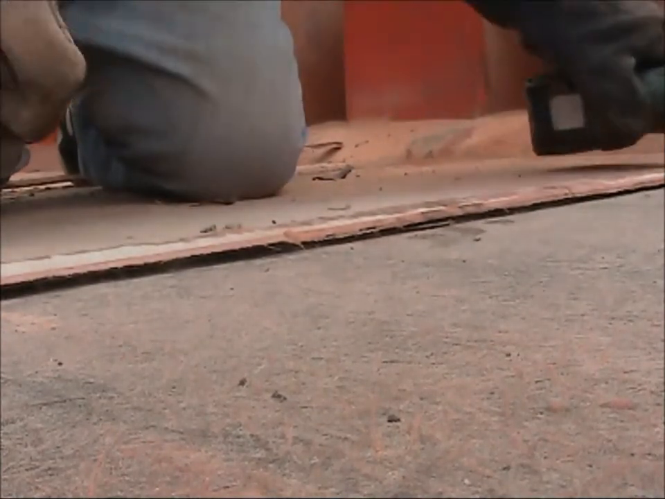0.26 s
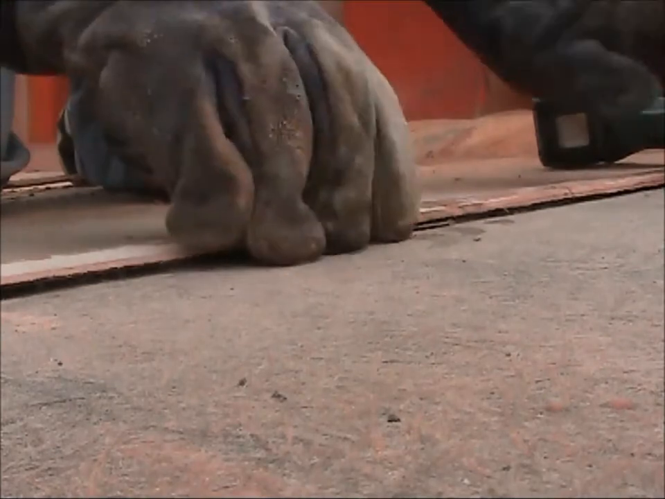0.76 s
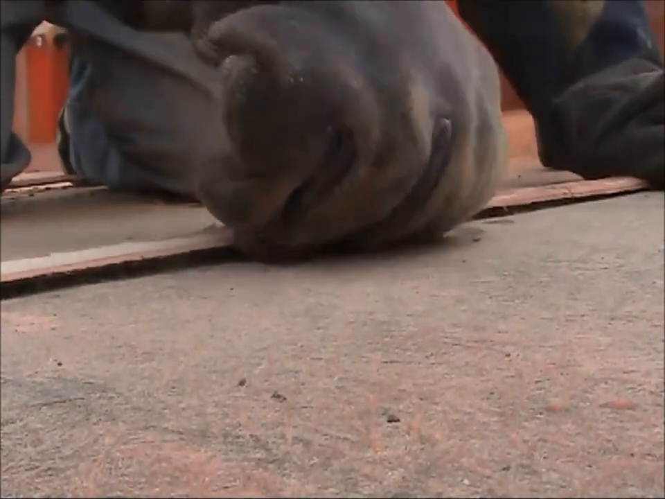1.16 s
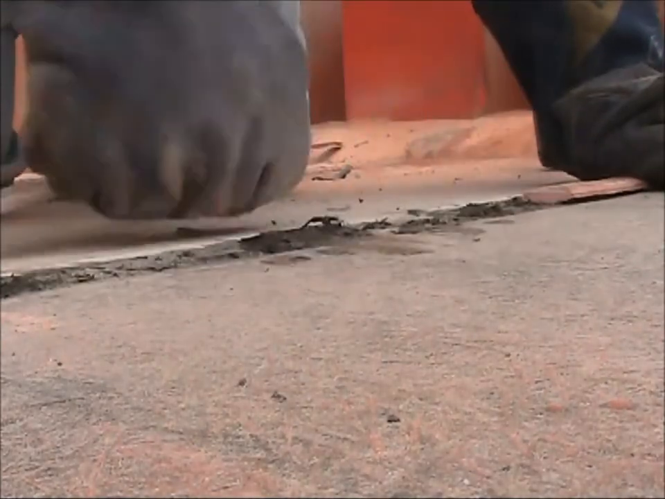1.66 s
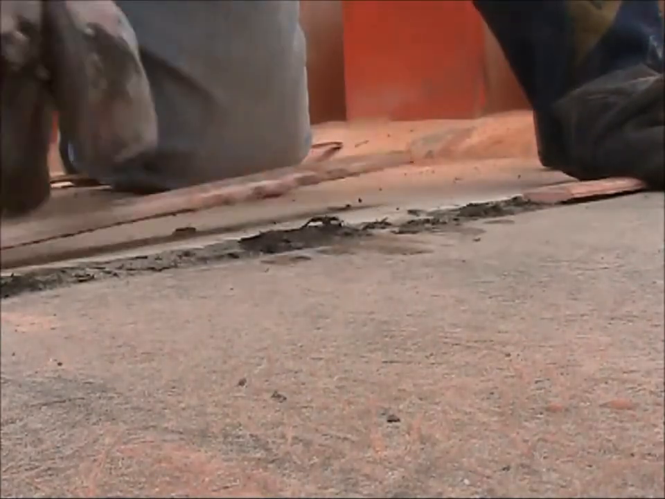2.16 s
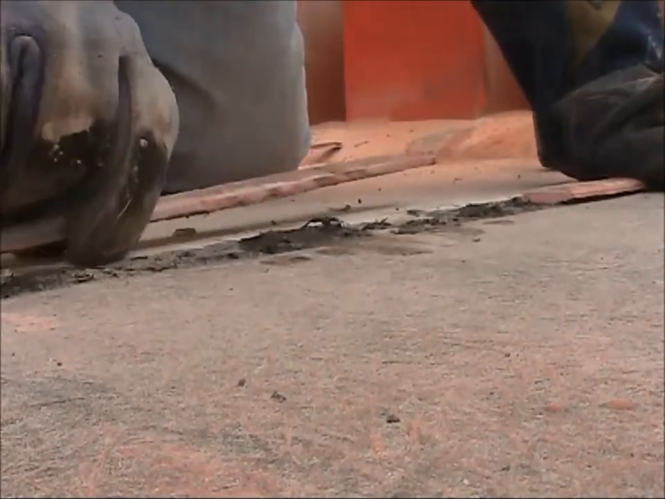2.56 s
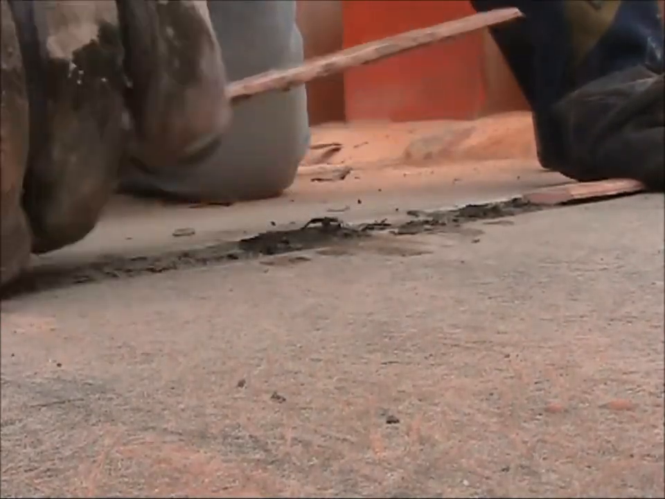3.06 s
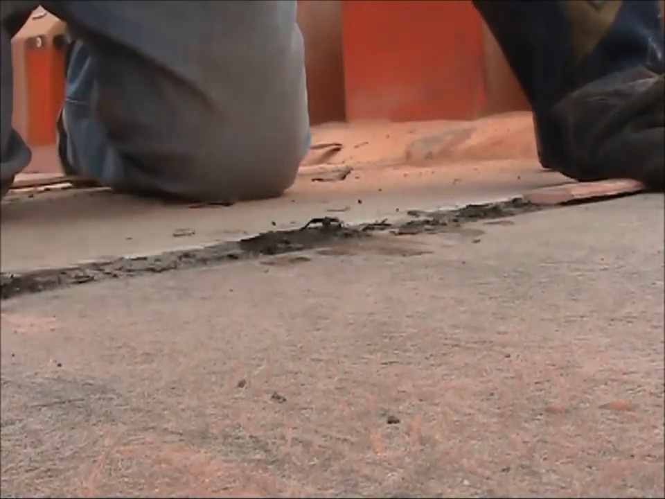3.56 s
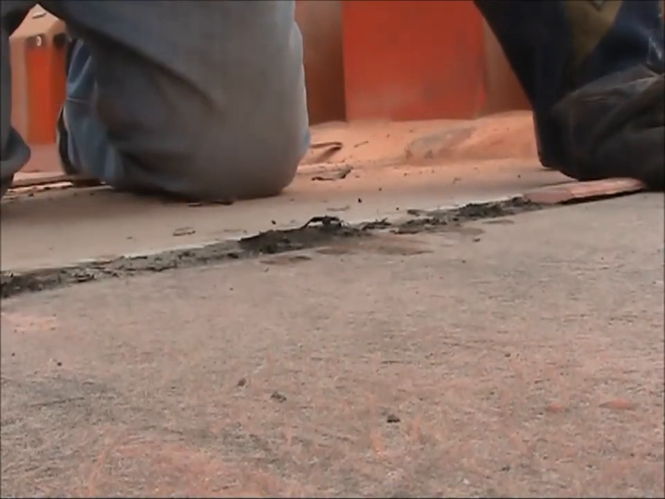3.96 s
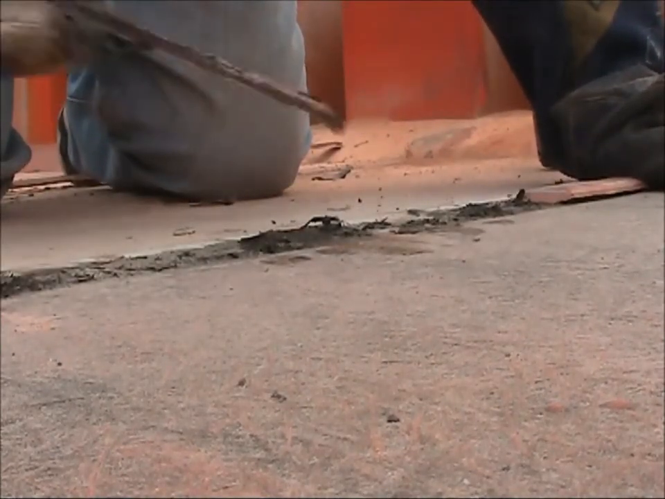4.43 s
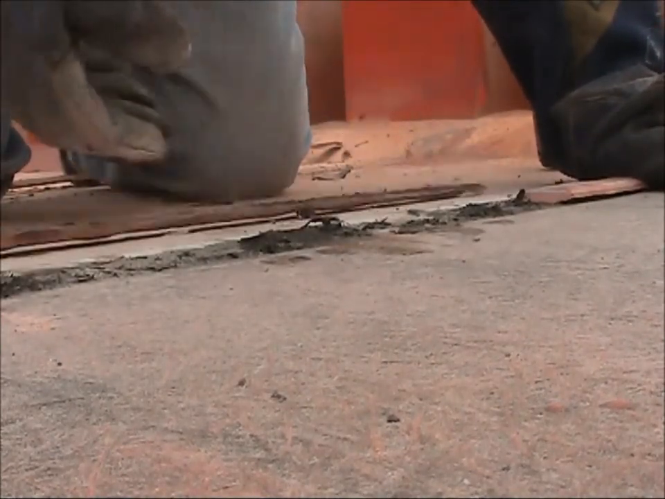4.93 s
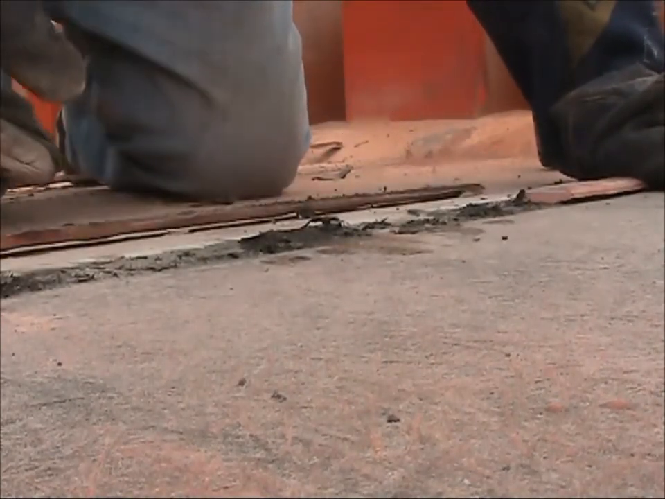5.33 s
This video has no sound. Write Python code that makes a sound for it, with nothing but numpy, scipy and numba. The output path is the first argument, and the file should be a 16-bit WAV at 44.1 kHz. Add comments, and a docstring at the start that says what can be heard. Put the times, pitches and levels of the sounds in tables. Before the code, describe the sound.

A steady, low, distant outdoor wash runs throughout, heard by a close stereo microphone near a hollow fibreglass deck. At 0.36 s a heavy stopped tool is set down: a booming double thump with casing rattle, settling by 0.6 s. Padded glove knocks and gritty scuffs follow from 0.7 to 1.3 s, with small cracks near 1.25 s. At 1.46 s a stiff strip snaps loudly, then unzips in rasping, groaning jerks until 1.7 s. Soft knocks and rubs come around 1.9-2.5 s, then light ticks, faint rough squeaks near 2.8 s and short damped rings. From 3.2 to 3.8 s tearing builds: sharp bright cracks, hiss, crackle and a sinking groan, slightly left. A final snap at 3.98 s rings out. After a lull, tiny rising squeals at 4.7 s precede a hard slapping clatter at 4.8 s, with bounces until 5.02 s. Loud blows clip and duck the level; only the wash remains.

```python
"""A strip of cut fibreglass snaps off a hollow boat deck, is torn free by a gloved hand, drops and bounces.
Breaks are bursts of noise that set the strip ringing; peeling adds rasps, hisses, crackle, groans and squeals.
Before that, a stopped angle grinder is set down: it rings the deck and its casing rattles. Glove and knee
knock on the deck and scuffs rub it. Steady outdoor noise lies behind. Loud blows clip and duck the level."""
import sys
import numpy as np
from scipy import signal
from scipy.fft import rfft, irfft, next_fast_len
from scipy.io import wavfile
from scipy.ndimage import map_coordinates
from numba import njit

SR = 44100
rng = np.random.default_rng(int(sys.argv[2]) if len(sys.argv) > 2 else 0)


def transcribe(u):
    """Save the signal u as a 16-bit wav file named by the first command-line argument.

    u: samples, shape (n,) or (channels, n), limited to [-1, 1]; the rate is SR.
    q: integer samples, one column per channel.
    """
    v = np.clip(np.atleast_2d(u).T, -1, 1)
    q = np.round(v * 32767).astype(np.int16)
    wavfile.write(sys.argv[1], SR, q)


N = 246519
T = np.arange(SR // 4) / SR  # seconds within one short sound
CLOCK = np.arange(N) / SR  # seconds within the scene
PORTS = np.array([[1], [-1]])  # sign of the left and right microphone port

# Bundles of fibres that give way, and the sharp front of one knock. Each row: start in seconds,
# relative level in dB, centre of the crack in Hz, t60 (time to fade by 60 dB) of the crackle in seconds.
CRACK_EVENTS = [(1.221, -22.5, 5070, 0.005), (1.277, -16.5, 2300, 0.019), (2.311, -25.5, 4200, 0.004),
                (2.469, -19, 3470, 0.0038), (2.665, -24.5, 3950, 0.0045), (2.677, -23, 4900, 0.0047),
                (2.8194, -17, 8700, 0.0081), (3.139, -28.5, 7000, 0.0037), (3.193, -24.5, 4970, 0.0035),
                (3.2164, -21, 5840, 0.0077), (3.312, -13.5, 3040, 0.0068), (3.32, -14.5, 2500, .008),
                (3.352, -22, 3000, 0.0054), (3.3579, -5.5, 2230, 0.0035), (3.3972, -10.5, 2500, 0.0057),
                (3.417, -20, 6000, .005), (3.428, -15, 7000, .005), (3.4494, -9.5, 7100, 0.0093),
                (3.457, -4.5, 6860, 0.017), (3.519, -1, 5030, 0.018), (3.5313, -10.5, 4100, 0.008),
                (3.544, -12, 5040, 0.019), (3.618, -22, 6000, .003), (3.626, -14, 9000, 0.0046),
                (3.6427, -8.5, 6000, 0.0099), (3.65, -13, 6060, .004), (3.6554, -20, 7000, .012),
                (3.674, -17, 8000, .005), (3.7251, -15.5, 3000, .01), (3.77, -16, 4000, 0.009),
                (3.7775, -2.5, 5800, 0.011), (3.9352, -16.5, 6860, 0.0042), (3.956, -16.5, 6500, 0.018),
                (3.983, -3.5, 7960, 0.0044)]
# The far end of the strip breaks free. Each row: start in seconds, relative crack level in dB,
# relative ring level in dB, centre of the ring in Hz.
FAR_BREAK = [(3.9853, -8, -21, 1360), (3.9882, -9, -20, 676), (3.9911, -8.5, -12.5, 317)]
# Ways in which the strip and the deck can ring, before each blow varies them slightly.
# Each row: frequency in Hz, relative level in dB, t60 in seconds for a life of 1.
STRIP_MODES = [(198, -4.5, 0.083), (305, 1.5, 0.124), (383.4, -5.5, 0.14), (423.7, 1.5, 0.16),
               (510, -2.5, 0.02), (646, 5.5, 0.055), (970, 5, 0.051), (1170, -6, .04), (1248, -4, 0.038),
               (1297, 11, 0.04), (1597, -6, 0.066), (1970, 8, 0.016), (3050, 0, 0.059), (3280, 14, 0.054),
               (5250, -12, 0.024)]
DECK_MODES = [(121.7, 3, 0.4), (133, 2, 0.21), (171, -0.5, 0.17), (201, 0.5, 0.26), (237.2, -6, 0.43),
              (283, 7, 0.18), (382.5, 4.5, 0.13), (406, -2.5, 0.19), (498, 4, 0.2), (569, -17, 0.26),
              (646, 0, 0.22), (716, 1.5, 0.16), (804, 2.5, 0.054), (820, 3.5, 0.067), (1000, -4, 0.22),
              (1290, 2.5, 0.14), (1360, -14, 0.15), (1914, 15.5, 0.07)]
# Tone colours of parting fibres and of soft contacts. Each row: frequency in Hz, relative level in dB per Hz.
FIBRE_SPECTRUM = [(100, -46), (300, 16.5), (480, 6.5), (750, -2), (1300, 1), (2200, -2.5), (3800, 4.5),
                  (6000, 0.5), (7800, -1), (9500, 2), (12000, -17), (15500, -6.5)]
TAP_SPECTRUM = [(100, -4.5), (500, 4), (1800, 0), (3500, -23), (8000, -29), (15500, -36)]


def breaking():
    """The strip snaps off nearby, unzips in scraping jerks and at last breaks free at its far end."""
    # A quick run of cracks. Each row: start in seconds, relative crack level in dB,
    # relative ring level in dB, centre of the ring in Hz.
    near_break = [(1.4615, -30, -21, 900), (1.4653, 1.5, 8, 1360), (1.469, -3, -2, 298),
                  (1.4728, -4, -9, 590), (1.4767, -1, -19, 330), (1.484, 2, -6, 547)]
    # The seam unzips. Each row: time in seconds, relative crack level in dB, relative scrape level in dB.
    jerk_rows = [(1.518, 0.5, -25), (1.568, -19.5, -21), (1.614, -18, -20.5), (1.664, -34, -34.5)]
    # Tone of the cracks. Each row: frequency in Hz, relative level in dB per Hz.
    crack_spectrum = [(100, -5), (400, 3.5), (1300, -6.5), (2300, -1), (4000, 2.5), (6500, 4), (9500, -4.5),
                      (12000, -11.5), (15500, -12)]
    # Tone of the scrape. Each row: frequency in Hz, relative level in dB per Hz.
    scrape_spectrum = [(300, -15), (1500, -9), (2600, 1), (3400, -3.5), (5000, 5), (6800, -5), (9000, -14),
                       (15500, -22)]
    rise_s, fall_s = 0.015, 0.013  # swell of the scrape around each jerk
    jerks = []
    slipping = np.zeros(N)
    for k, (s, crack_db, scrape_db) in enumerate(jerk_rows):
        ring_db = -9 - 11.5 * k  # each jerk rings less than the one before
        centre_hz = 780 * 0.71 ** k  # the ring drops as the freed length grows
        jerks.append((s, crack_db, ring_db, centre_hz))
        slipping += amp(scrape_db) * swell(s - rise_s, s, s + fall_s)
    near = strip_blows(near_break + jerks, crack_spectrum, octaves=0.72, life=0.57, puff_db=14.0,
                       edge_hz=23000, crack_t60=0.0089, tail_db=-23, tail_t60=0.044)
    near += rasp(slipping, scrape_spectrum, grain_db=0.5, clump_db=4.5)
    far = strip_blows(FAR_BREAK, FIBRE_SPECTRUM, octaves=0.61, life=1.0, puff_db=24,
                      edge_hz=18000, crack_t60=0.012, tail_db=-10.5, tail_t60=0.064)
    near_ports = placed(near, lead_us=29.0, pan_db=3.5, wet_db=-6.5, wet_t60=0.11)
    far_ports = placed(far, lead_us=36.0, pan_db=2.0, wet_db=-3.5, wet_t60=0.022)
    return near_ports + far_ports


def sharp_cracks():
    """Off to the left, fibre bundles snap and ring the hand-damped strip; one crack sharpens a knock."""
    # Tone of the snaps. Each row: frequency in Hz, relative level in dB per Hz.
    snap_spectrum = [(200, -1), (1500, 3), (9500, 1.5), (12000, -4.5), (15500, 3)]
    crack_offset_db, ring_offset_db = 9, -14.5
    ring_growth = 1.05  # big cracks ring the strip more
    usual_hz, scatter_octaves = 474, 0.11  # each crack rings at its own place
    body, cracks = np.zeros((2, N))
    for s, db, crack_hz, t60 in CRACK_EVENTS:
        add(cracks, s, amp(db + crack_offset_db) * snap(crack_hz, t60, octaves=0.62))
        centre_hz = usual_hz * 2 ** (scatter_octaves * rng.normal())
        sound = ring(STRIP_MODES, centre_hz, octaves=0.69, life=0.7, puff_db=14.0, puff_t60=0.11)
        add(body, s, amp(ring_growth * db + ring_offset_db) * sound)
    dry_cracks = body + coloured(cracks, snap_spectrum)
    return placed(dry_cracks, lead_us=29.5, pan_db=4.5, wet_db=-3.5, wet_t60=0.02)


def dropped():
    """The loose strip lands along its length, then end by end; the first landing also pushes the deck."""
    # Landings. Each row: start in seconds, relative slap level in dB, relative ring level in dB,
    # centre of the ring in Hz.
    landings = [(4.799, 9, 6.5, 520), (4.8067, 14, 3, 900), (4.8135, 13, -2, 556), (4.822, -1, -6.5, 480),
                (4.879, -37, -13, 510), (4.92, 1, -15.5, 1190), (4.926, -10.5, -12, 620),
                (4.93, -2.5, -7, 590), (4.96, -42, -21, 700), (4.9682, -33, -23, 910),
                (4.98, -9.5, -13.5, 1290), (4.984, -36, -10.5, 424), (5.018, -18.5, -22, 1190)]
    # Tone of the slaps. Each row: frequency in Hz, relative level in dB per Hz.
    slap_spectrum = [(40, -32), (180, -1.5), (420, 8.5), (650, -1), (1300, 2), (2400, -0.5), (3600, 0.5),
                     (6000, -4.5), (8500, -11.5), (11500, -25.5), (15500, -16)]
    clatter = strip_blows(landings, slap_spectrum, octaves=0.85, life=0.75, puff_db=12,
                          edge_hz=6500, crack_t60=0.006, tail_db=-21, tail_t60=0.06)
    thud_db, thud_hz = -6.5, 44.3
    thud = ring(DECK_MODES, thud_hz, octaves=0.94, life=1.0, puff_db=13.0, puff_t60=.047)
    add(clatter, landings[0][0], amp(thud_db) * thud)
    return placed(clatter, lead_us=23, pan_db=2.0, wet_db=-5.5, wet_t60=0.03)


def short_rings():
    """The held strip rings briefly, from knocks on the deck or from tears, damped by the hand."""
    # Short rings. Each row: start in seconds, relative level in dB, centre of the ring in Hz.
    ring_rows = [(2.889, -24.5, 1150), (2.8953, -21, 1080), (2.897, -25.5, 436), (3.076, -22.5, 1130),
                 (3.206, -20, 463), (3.229, -16.5, 470), (3.429, -24, 420), (3.458, -16, 500),
                 (3.533, -19.5, 554), (3.744, -19.5, 880)]
    front_db = -9  # noise at the front against the ring
    body, fronts = np.zeros((2, N))
    for s, db, centre_hz in ring_rows:
        sound = ring(STRIP_MODES, centre_hz, octaves=0.36, life=0.35, puff_db=10.5, puff_t60=0.055)
        add(body, s, amp(db) * sound)
        add(fronts, s, amp(db + front_db) * burst(t60=0.017, tail_db=-11, tail_t60=0.043))
    return placed(body + coloured(fronts, TAP_SPECTRUM), lead_us=20, pan_db=1.5, wet_db=-5, wet_t60=0.049)


def groaning():
    """Parting fibres shake the strip's bending mode: a band of noise sinks in pitch, with uneven jolts."""
    # Groans while peeling. Each row: start in seconds, end in seconds, first pitch in Hz,
    # last pitch in Hz, starting level in dB, fade in dB.
    groan_rows = [(1.48, 1.687, 570, 300, -29, 11), (3.363, 3.737, 480, 290, -39, 4)]
    knots_per_s = 190  # faster wobbles make a wider band of noise
    groan = np.zeros(N)
    for start, end, first_hz, last_hz, db, fade_db in groan_rows:
        freed = np.clip((CLOCK - start) / (end - start), 0, 1)
        pitch = first_hz + (last_hz - first_hz) * freed
        phase = 2 * np.pi * np.cumsum(pitch) / SR
        shake = wobble(knots_per_s) * np.sin(phase) + wobble(knots_per_s) * np.cos(phase)
        jolts = unit(amp(3 * wobble(70)))
        soft_ends = np.minimum(10 * np.minimum(freed, 1 - freed), 1)
        groan += shake * jolts * amp(db - fade_db * freed) * soft_ends
    return placed(groan, lead_us=31, pan_db=2.0, wet_db=-3.5, wet_t60=0.086)


def squeals():
    """Stick and slip as the strip is drawn along and swung down: rough whistles glide, swell and fade."""
    # Squeals. Each row: start in seconds, end in seconds, first pitch in Hz, last pitch in Hz,
    # relative level in dB, pitch roughness as a share of the pitch.
    squeal_rows = [(2.735, 2.805, 2850, 2600, -44, .11), (2.78, 2.822, 2620, 2230, -45, .03),
                   (2.765, 2.825, 3900, 3300, -48, .11), (4.685, 4.722, 4130, 4560, -48, .025),
                   (4.712, 4.75, 4480, 4700, -42, .035), (4.768, 4.8, 4230, 4500, -43, .045)]
    sound = np.zeros(N)
    for start, end, first_hz, last_hz, db, rough in squeal_rows:
        glide = np.interp(CLOCK, [start, end], [first_hz, last_hz])
        pitch = glide * (1 + rough * wobble(900))
        level = amp(db + 3 * wobble(250)) * np.sqrt(swell(start, (start + end) / 2, end))
        sound += level * np.sin(2 * np.pi * np.cumsum(pitch) / SR)
    return sound


def scuffs_and_rips():
    """Scuffs on the gritty deck, bright hissing rips of fibres, and a peeling rasp that swells at cracks."""
    # Scuffs on the deck and bright hissing rips of fibres. Each row: start in seconds, length in seconds,
    # relative level of the coarse noise in dB, relative level of the fine hiss in dB.
    noise_rows = [(0.489, 0.14, -37, -46.5), (0.784, 0.049, -32, -40), (0.95, 0.081, -35, -46),
                  (0.977, 0.21, -42.5, -54), (1.023, 0.073, -39, -50), (1.127, 0.019, -36, -52),
                  (1.266, 0.048, -32, -58), (1.479, 0.18, -31, -37), (1.885, 0.092, -44, -50),
                  (2.127, 0.054, -41.5, -51), (2.437, 0.044, -32, -44), (2.651, 0.22, -38.5, -43),
                  (2.88, 0.02, -35, -45), (2.93, 0.17, -43, -48.5), (3.067, 0.031, -42, -42),
                  (3.109, 0.18, -43.5, -55), (3.362, 0.028, -28.5, -54), (3.409, 0.024, -34, -34),
                  (3.505, 0.024, -31, -19), (3.616, 0.078, -36, -28.5), (3.711, 0.054, -30.5, -35)]
    # The long pull. Each row: time in seconds, relative level of the rasp in dB.
    pull_curve = [(3.3, -48), (3.522, -36.5), (3.582, -39), (3.736, -36.5), (3.82, -79)]
    # Tone of the coarse noise. Each row: frequency in Hz, relative level in dB per Hz.
    coarse_spectrum = [(100, -2), (400, 3), (1200, 3.5), (1900, 2), (2600, 5), (3400, 4), (4800, 0.5),
                       (7000, -5), (9500, -13.5), (12000, -24), (15500, -12)]
    # Tone of the fine hiss. Each row: frequency in Hz, relative level in dB per Hz.
    hiss_spectrum = [(1000, -41), (4000, -20), (6500, 2.5), (9500, 7), (12000, -4.5), (15500, 2)]
    rise_share = 0.52  # share of each noise spent swelling
    coarse, fine = np.zeros((2, N))
    for s, length, coarse_db, hiss_db in noise_rows:
        pressure = swell(s, s + rise_share * length, s + length)
        coarse += amp(coarse_db) * pressure
        fine += amp(hiss_db) * pressure
    noises = rasp(coarse, coarse_spectrum, grain_db=6.0, clump_db=3.0)
    noises += rasp(fine, hiss_spectrum, grain_db=6.0, clump_db=4.0)

    # a rasp swells just before and fades just after each crack
    before_s, after_s, strain_db = 0.016, 0.03, -28.5
    strain = np.zeros(N)
    for s, db, _, _ in CRACK_EVENTS:
        strain += amp(db + strain_db) * swell(s - before_s, s, s + after_s)
    s, db = np.transpose(pull_curve)
    pull_db, fade_s = -8, 0.086
    pulling = np.clip(np.minimum(CLOCK - s[0], s[-1] - CLOCK) / fade_s, 0, 1)
    pull = pulling * amp(np.interp(CLOCK, s, db) + pull_db)
    attached = CLOCK < FAR_BREAK[-1][0] + 0.021  # the last fibres part just after the final break
    peels = rasp((strain + pull) * attached, FIBRE_SPECTRUM, grain_db=3.5, clump_db=-3.5)
    peels += crackle(amp(3) * pull)  # single fibres, 3 dB above the pull
    return placed(noises + peels, lead_us=26.2, pan_db=1.0, wet_db=-5.0, wet_t60=0.048)


def grinder():
    """The heavy tool thumps the hollow deck edge first, rocks and settles; its casing rattles."""
    # Contacts. Each row: start in seconds, relative deck level in dB, centre of the ring in Hz,
    # relative level of the casing rattle in dB.
    contacts = [(.3635, 11, 760, -10), (0.3663, 18, 290, -2), (0.3718, 14, 397, -2.5),
                (.377, 15.5, 138, -9.5), (0.385, 5, 187, -7), (0.397, -4, 700, -24),
                (0.4227, -3, 785, -17.5), (.426, 11.5, 217, -11.5), (0.4314, -0.5, 626, -9.5),
                (0.437, 5, 266, -8), (0.4457, -26, 560, -25), (0.537, -10, 205, -41),
                (.549, -0.5, 157, -38), (.573, -7.5, 177, -48)]
    # Tone of the rattle. Each row: frequency in Hz, relative level in dB per Hz.
    casing_spectrum = [(200, 9), (900, -4.5), (2000, 2), (2800, -5.5), (4300, 6), (5400, -5), (6400, -12.5),
                       (8200, -6.5), (11000, -24.5), (15500, -21)]
    push_db, push_hz = -24, 38  # a low push under every contact
    deck, casing = np.zeros((2, N))
    for s, deck_db, centre_hz, rattle_db in contacts:
        push = ring(DECK_MODES, push_hz, octaves=1.0, life=0.5, puff_db=1.0, puff_t60=.035)
        thump = ring(DECK_MODES, centre_hz, octaves=0.74, life=0.55, puff_db=15.5, puff_t60=0.085)
        add(deck, s, amp(deck_db + push_db) * push)
        add(deck, s, amp(deck_db) * thump)
        add(casing, s, amp(rattle_db) * burst(t60=0.023, tail_db=-9.0, tail_t60=0.12))
    dry_grinder = deck + coloured(casing, casing_spectrum)
    return placed(dry_grinder, lead_us=-30, pan_db=2.5, wet_db=-3.0, wet_t60=0.023)


def knocks():
    """Padded touches of glove and knee, and a low deck thump as the strip breaks free; high ones die sooner."""
    # Knocks and the thump (last row). Each row: start in seconds, relative level in dB,
    # centre of the ring in Hz.
    deck_blows = [(0.726, -12.5, 448), (.742, -13.5, 242), (1.038, -16, 507), (1.044, -15, 277),
                  (1.054, -19, 290), (1.086, -25, 294), (1.136, -26.5, 305), (1.278, -17, 383),
                  (1.938, -22, 393), (2.083, -26.5, 368), (2.322, -29, 330), (2.469, -30, 332),
                  (3.75, -21, 216), (3.994, -26.5, 120)]
    life_at_400_hz, damping = 0.46, 0.59  # share of the free deck's ring time; how fast it falls with pitch
    tap_db, tap_db_per_octave = -13, 3.5  # contact noise at 600 Hz; harder, higher knocks have more
    deck, taps = np.zeros((2, N))
    for s, db, centre_hz in deck_blows:
        life = life_at_400_hz * (400 / centre_hz) ** damping
        sound = ring(DECK_MODES, centre_hz, octaves=0.4, life=life, puff_db=19.5, puff_t60=0.24 * life)
        add(deck, s, amp(db) * sound)
        hardness = np.log2(centre_hz / 600)
        contact_db = db + tap_db + tap_db_per_octave * hardness
        add(taps, s, amp(contact_db) * burst(t60=0.023, tail_db=-4, tail_t60=0.041))
    return placed(deck + coloured(taps, TAP_SPECTRUM), lead_us=4.2, pan_db=2.5, wet_db=-17.5, wet_t60=0.049)


def outdoors():
    """A distant wash of noise reaches the right port first; a weaker one, opposite at the ports, widens it."""
    # Tone of the wash. Each row: frequency in Hz, relative level in dB per Hz.
    air_spectrum = [(25, -22), (60, -3), (120, 1.5), (185, 4.5), (260, -0.5), (430, 3.5), (600, -3.5),
                    (1200, -4), (2000, -8.5), (3300, -11), (5500, -13), (9000, -21), (12000, -30.5),
                    (15500, -27)]
    # Loudness over time. Each row: time in seconds, level in dB.
    level_curve = [(0, -41), (1, -38), (2, -41.5), (3, -42), (4.2, -42.5), (4.7, -41.5), (5.1, -42),
                   (5.59, -39.5)]
    wash = coloured(rng.standard_normal(N), air_spectrum)
    diffuse = coloured(rng.standard_normal(N), air_spectrum)
    lead_s = 30 / 10 ** 6
    pair = filtered(wash, lambda hz: np.exp(-1j * np.pi * hz * PORTS * lead_s))
    pair += PORTS * amp(-8.5) * diffuse
    level_db = np.interp(CLOCK, *np.transpose(level_curve)) + 0.043 * wobble(5.2)
    return pair * amp(level_db + PORTS * 0.12)


def strip_blows(blows, spectrum, octaves, life, puff_db, edge_hz, crack_t60, tail_db, tail_t60):
    """Each break or contact is a sharp crack, duller when weak, and the stiff strip rings after it."""
    dulling_db_per_octave = 22  # a blow this much weaker sounds an octave duller
    body, cracks = np.zeros((2, N))
    for s, crack_db, ring_db, centre_hz in blows:
        add(body, s, amp(ring_db) * ring(STRIP_MODES, centre_hz, octaves, life, puff_db, puff_t60=0.084))
        cutoff_hz = edge_hz * 2 ** (crack_db / dulling_db_per_octave)
        pole = np.exp(-2 * np.pi * cutoff_hz / SR)
        crack = signal.lfilter([1 - pole], [1, -pole], burst(crack_t60, tail_db, tail_t60))
        add(cracks, s, amp(crack_db) * crack)
    return body + coloured(cracks, spectrum)


def ring(modes, centre_hz, octaves, life, puff_db, puff_t60):
    """A struck panel: clear modes and a puff of crowded, damped ones; the blow favours a band of pitches."""
    hz, db, t60 = np.transpose(modes)
    size = amp(db + rng.standard_normal(len(hz)))
    hz = hz * (1 + 0.012 * rng.standard_normal(len(hz)))  # slight detuning
    waves = np.sin(2 * np.pi * hz[:, None] * T) * decay(life * t60[:, None])
    puff = amp(puff_db) * rng.standard_normal(len(T)) * decay(puff_t60)
    sound = band(size @ waves + puff, centre_hz, octaves, order=2)
    early_level = np.sqrt(np.mean(sound[:SR // 50] ** 2))  # first 20 ms
    return sound / early_level / 4


def burst(t60, tail_db, tail_t60):
    """Countless high modes: a hard front, a quick flash of noise and a weaker, longer tail."""
    rise_s = 0.00041
    rise = 1 - np.exp(-T / rise_s)
    fall = 2.3 * decay(0.0047) + 0.85 * decay(t60) + amp(tail_db) * decay(tail_t60)
    return rng.standard_normal(len(T)) * rise * fall


def snap(centre_hz, t60, octaves):
    """One hard spike and a spiky crackle, as of single fibres parting, in a band of pitches."""
    fibres = rng.standard_normal(len(T)) * amp(10 * rng.standard_normal(len(T))) * decay(t60)
    fibres /= np.linalg.norm(fibres)
    fibres[0] += 0.81  # the first spike against the crackle that follows
    sound = band(fibres, centre_hz, octaves, order=1)
    return sound / np.linalg.norm(sound)


def rasp(pressure, spectrum, grain_db, clump_db):
    """Under pressure, grit and fibres catch in tiny uneven clumps."""
    unevenness_db = grain_db * wobble(2500) + clump_db * wobble(200)
    grains = unit(rng.standard_normal(N) * amp(unevenness_db))
    return coloured(grains * pressure, spectrum)


def crackle(pressure):
    """Single fibres part at random moments as very short ticks of noise, with gaps between them."""
    # Tone of the ticks. Each row: frequency in Hz, relative level in dB per Hz.
    tick_spectrum = [(300, -14), (2000, 5), (4000, 0), (9500, 4), (12000, -16), (15500, -4)]
    ticks_per_s, spread_db = 170, 4
    clicks = (rng.random(N) < ticks_per_s / SR) * amp(spread_db * rng.standard_normal(N))
    ticks = signal.fftconvolve(clicks, decay(.002))[:N] * rng.standard_normal(N)
    return coloured(unit(ticks) * pressure, tick_spectrum)


def swell(start, top, end):
    """Pressure that builds up and lets go."""
    return np.interp(CLOCK, np.sort([start, top, end]), [0, 1, 0]) ** 1.09


def placed(x, lead_us, pan_db, wet_db, wet_t60):
    """Two close microphone ports hear a source, and each its own scatter from the deck and hull sides."""
    # lead_us and pan_db say how much earlier (microseconds) and louder the left port hears it
    lead = filtered(x, lambda hz: np.exp(1j * np.pi * hz * PORTS * lead_us / 10 ** 6))
    direct = lead * amp(PORTS * pan_db / 2)
    tails = rng.standard_normal((2, len(T))) * decay(wet_t60) * (T > .001)
    tails /= np.linalg.norm(tails, axis=1, keepdims=True)
    scatter = signal.fftconvolve(x[None], tails, axes=1)[:, :N]
    # the scatter has less bass
    return direct + amp(wet_db) * filtered(scatter, lambda hz: (1j * hz + 150) / (1j * hz + 900))


def amp(db):
    """Turn dB into an amplitude factor."""
    return 10 ** (np.asarray(db) / 20)


def unit(x):
    """Scale a sound to an average (RMS) level of 1."""
    return x / np.sqrt(np.mean(x ** 2) + 1e-20)


def decay(t60):
    """A fade that loses 60 dB in t60 seconds."""
    return np.exp(-np.log(1000) * T / np.maximum(t60, 1e-3))


def add(track, s, sound):
    """Mix a sound into a track from second s."""
    part = track[round(s * SR):][:len(sound)]
    part += sound[:len(part)]


def wobble(rate):
    """A smooth random curve through rate random points a second."""
    return map_coordinates(rng.standard_normal(int(N * rate / SR) + 4), [CLOCK * rate])


def band(x, centre_hz, octaves, order):
    """Keep the pitches within some octaves either side of a centre."""
    edges = np.clip(centre_hz * 2. ** np.array([-octaves, octaves]), 20, SR / 2 - 100)
    return signal.sosfilt(signal.butter(order, edges, "bandpass", fs=SR, output="sos"), x)


def filtered(x, response):
    """Filter x with a given complex response to each frequency."""
    m = next_fast_len(N + SR // 2)
    return irfft(rfft(x, m) * response(np.fft.rfftfreq(m, 1 / SR)), m)[..., :N]


def coloured(x, points, size=4096):
    """Give x a spectrum without sounding ahead of time; white noise keeps its level."""
    hz, db = np.transpose(points)
    gain = amp(np.interp(np.log(np.fft.rfftfreq(size, 1 / SR) + 1), np.log(hz), db))
    # fold the cepstrum so that the filter's energy comes as early as possible
    cepstrum = irfft(np.log(gain))
    cepstrum[1:size // 2] *= 2
    cepstrum[size // 2 + 1:] = 0
    kernel = irfft(np.exp(rfft(cepstrum)))
    return signal.fftconvolve(x, kernel / np.linalg.norm(kernel))[:N]


def scene():
    """All sources together, coloured a little differently by each microphone port."""
    # Port balance. Each row: frequency in Hz, left minus right in dB.
    port_balance = [(25, -9), (60, 4), (130, 1), (500, -0.5), (1000, -1.5), (2000, 1), (4000, 0.7),
                    (8000, -0.6), (15000, -1.3)]
    air = breaking() + sharp_cracks() + dropped() + short_rings() + groaning() + squeals()
    air += scuffs_and_rips() + grinder() + knocks() + outdoors()
    points, balance_db = np.transpose(port_balance)

    def port_response(hz):
        left_minus_right_db = np.interp(np.log(hz + 1), np.log(points), balance_db)
        return amp(PORTS * left_minus_right_db / 2)

    return filtered(air, port_response)


@njit
def follower(level, attack, release):
    """A level meter that rises fast and falls slowly (times in samples)."""
    out, held = np.empty(len(level)), 0.0
    for i in range(len(level)):
        held += (level[i] - held) / (attack if level[i] > held else release)
        out[i] = held
    return out


def record(dry):
    """Gain control ducks after loud blows, too late to keep their fronts from clipping."""
    attack_s, release_s, top_hz = 0.002, 0.17, 15700
    loudness = np.minimum(np.abs(dry).max(axis=0), 1.6)
    held = follower(loudness, attack_s * SR, release_s * SR)
    ducked = dry / np.sqrt(1 + (held / 0.7) ** 2)
    clipped = ducked / (1 + np.abs(ducked) ** 8) ** (1 / 8)
    return filtered(clipped, lambda hz: 1 / (1 + (hz / top_hz) ** 80))  # steep treble cut


dry = scene()
out = record(dry)
transcribe(out)
```